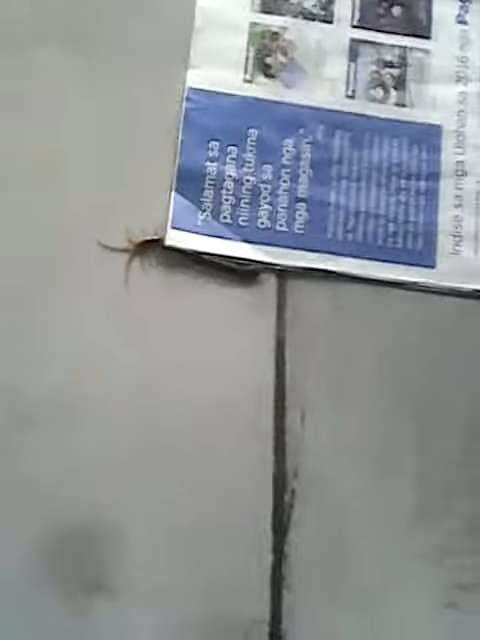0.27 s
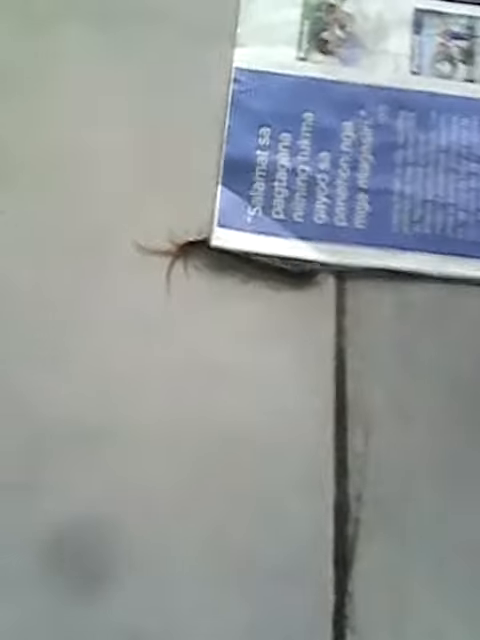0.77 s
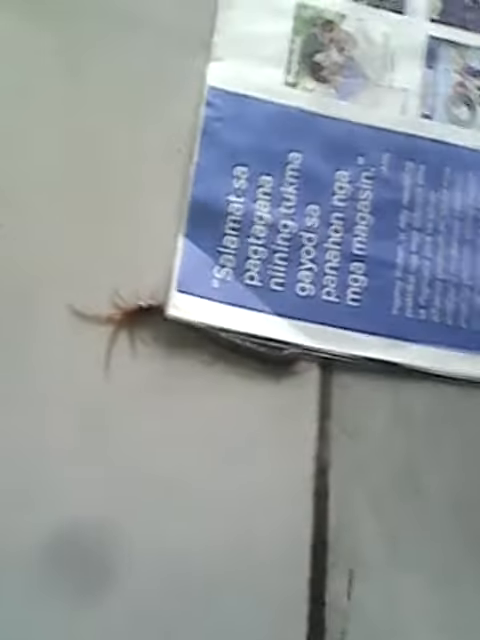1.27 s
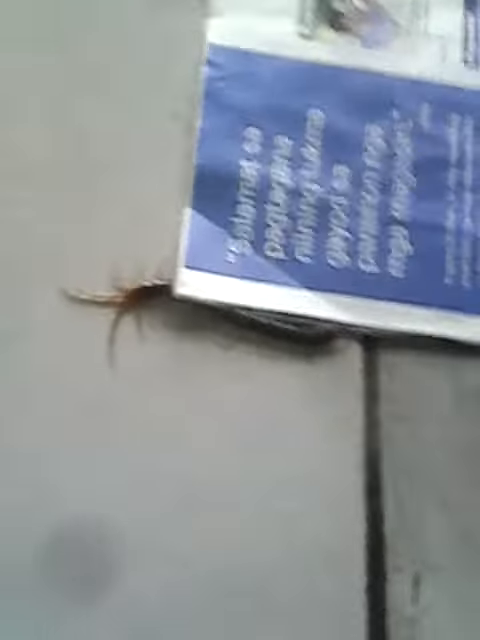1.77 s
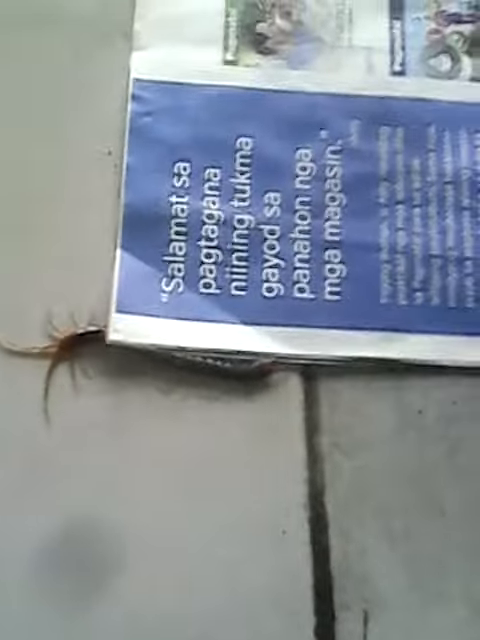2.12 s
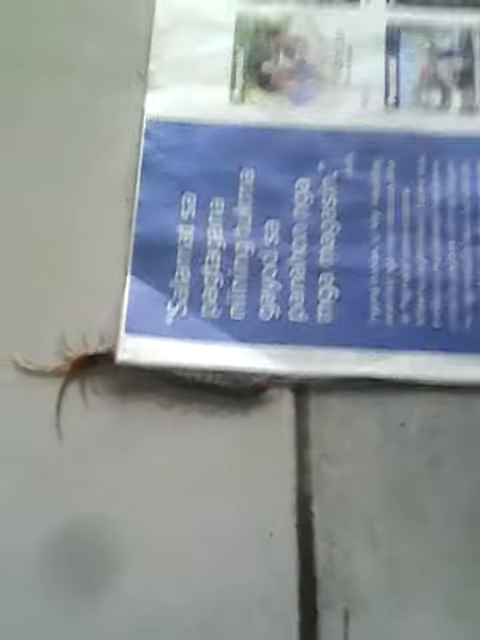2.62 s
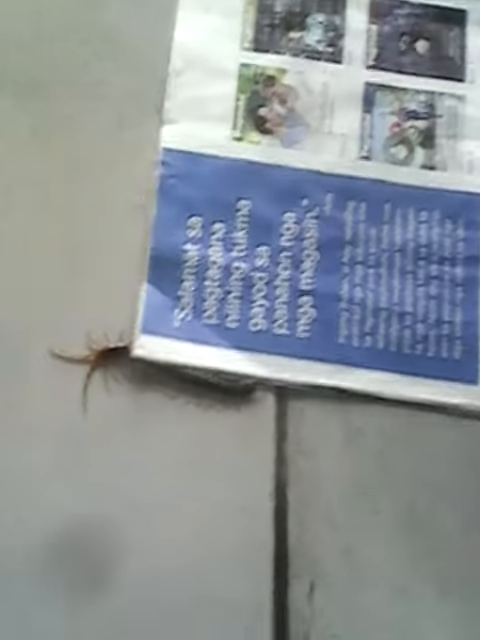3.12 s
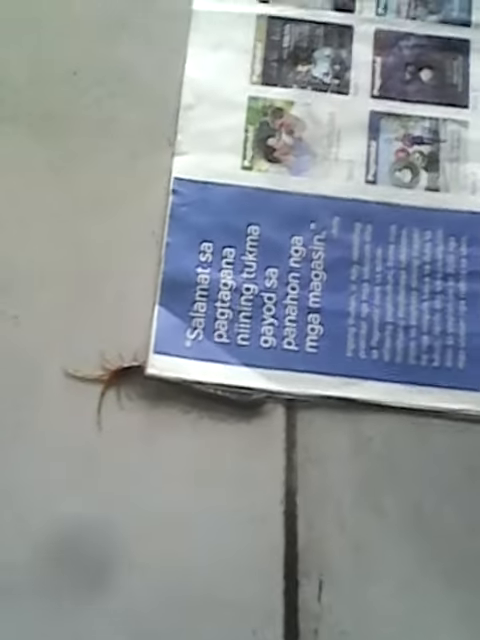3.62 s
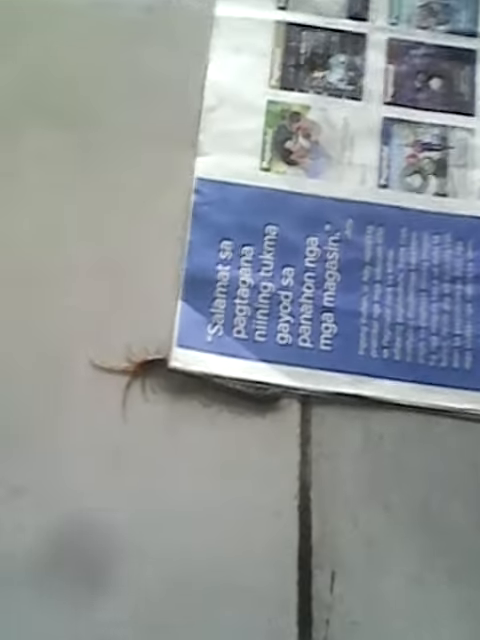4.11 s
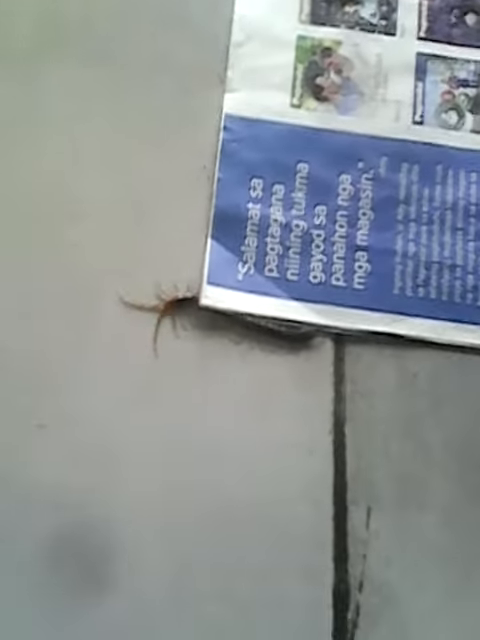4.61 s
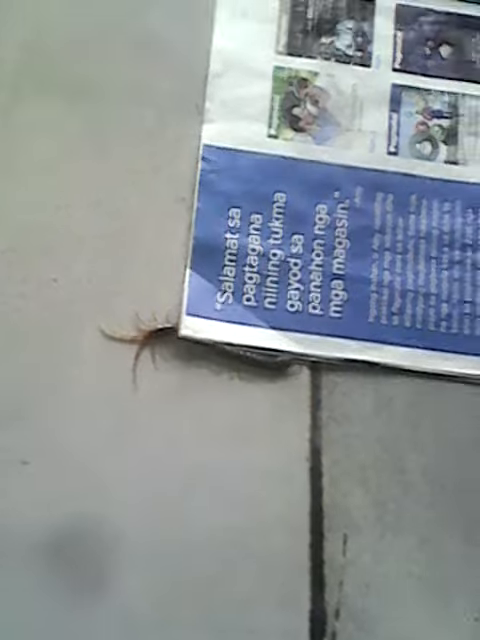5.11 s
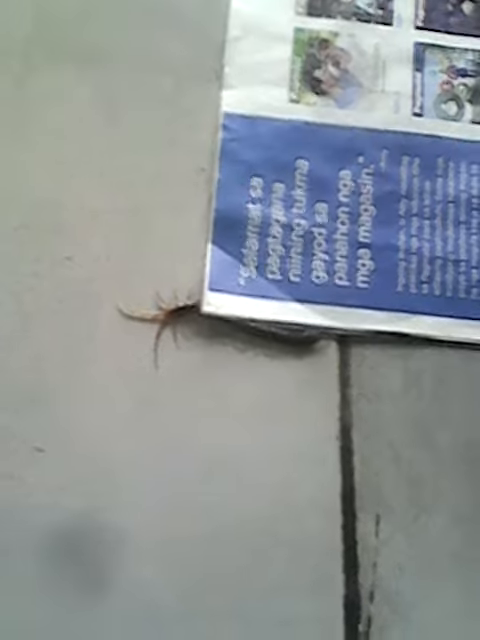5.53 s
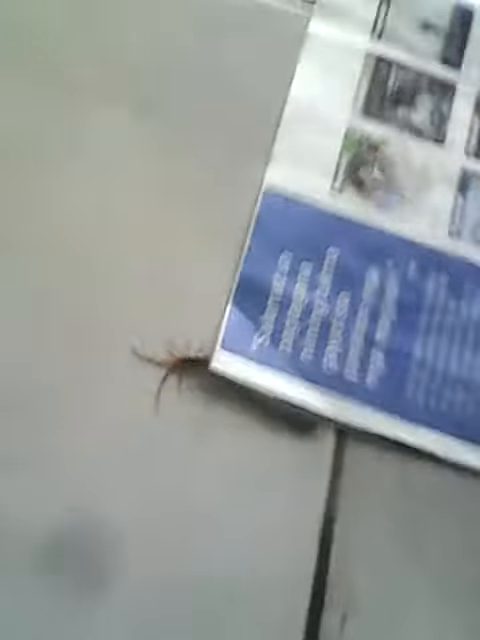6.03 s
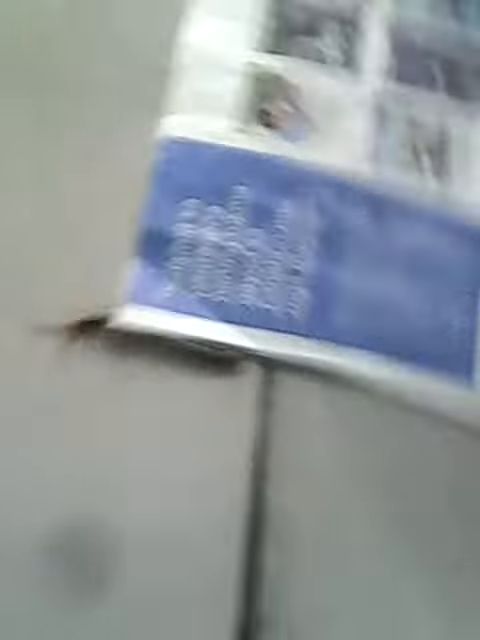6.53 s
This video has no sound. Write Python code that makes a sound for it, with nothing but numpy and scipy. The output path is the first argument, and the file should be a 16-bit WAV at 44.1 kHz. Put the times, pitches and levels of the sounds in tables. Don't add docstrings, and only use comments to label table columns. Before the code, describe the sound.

Over a low, wavering drone and soft hiss, a finger drags stickily across a plastic shell, making clustered creaks. The shell then lets go in sparse, short ticks, some soft, some sharp. After a quieter gap, rough hand rubbing and hard knocks crowd together, the loudest close to the end, with a deep thud just after. The sound is close, muffled on top, with a short dull room tail.

```python
import sys
import numpy as np
from scipy import signal
from scipy.fft import rfft, irfft, next_fast_len
from scipy.io import wavfile
from scipy.ndimage import uniform_filter1d, map_coordinates

SR = 44100
rng = np.random.default_rng(int(sys.argv[2]) if len(sys.argv) > 2 else 0)


def gain_from_db(level_db):
    decades = np.asarray(level_db, float) / 20
    return 10 ** decades


def put_to_file(sound):
    columns = np.atleast_2d(sound).T
    safe = np.clip(columns, -1, 1)
    whole_steps = np.round(safe * 32767)
    wavfile.write(sys.argv[1], SR, whole_steps.astype(np.int16))


N = 299233

# pitch in Hz, width in Hz, steadiness from 0 to 1.
DRONE_TONES = [(183.2, 18, 0.8), (411.5, 24, 0), (578.5, 10, 0.8), (1839, 72, 0.1)]
DRONE_IDLE_DB = [-71.5, -71, -70, -92.5]
# centre in seconds, length in seconds, level in
# dB.
DRONE_SWELLS = [
    [(.48, 0.21, -64), (1.45, 0.47, -68), (4.8, 0.24, -72), (6.55, 0.1, -53)],
    [(1.23, 0.082, -74), (2.3, 0.55, -68), (4.8, 1, -80.5), (5.88, 0.04, -62), (6.62, 0.071, -60)],
    [(2.1, 1, -67), (6.1, 0.24, -62), (6.65, 0.059, -57.5)],
    [(1.6, 0.16, -71), (2.3, 0.78, -82)],
]
# pitch in Hz, width in Hz, level over the air in dB, steadiness 0 to 1.
STEADY_TONES = [(77, 12, -14, 0.6), (123.9, 20, -7, 0.37), (352.6, 18, -21, .3), (647, 34, -16.5, .3),
                (6140, 1700, -29.5, .1)]
# frequency in Hz, level in dB per Hz.
AIR_COLOUR = [(20, -11), (45, -21.5), (100, -18.5), (171, 0), (324, -5.5), (500, -9.5), (700, -6.5),
              (1020, -11.5), (1240, -16.5), (1780, -20), (2280, -25), (5720, -33.5), (7990, -45),
              (15600, -46.5)]
# centre in seconds, length in seconds, level in dB.
DRAUGHTS = [
    (1.7, 0.11, -72),
    (4.05, 0.05, -84),
    (6.1, 0.13, -68),
    (6.72, .1, -66.5),
]

# start in seconds, pressure at the start in dB,
# pressure at the end in dB, brightness in dB, dryness of the skin in dB.
FINGER_STROKES = [(.555, -74, -64.5, -6, 7), (.627, -73, -56.5, -3, 14.5), (.647, -52.5, -52, -0.8, 6.5),
                  (.678, -58.5, -62, -14.5, 16), (.735, -64, -54, 0.5, 5), (.808, -47, -71.5, -1.9, 5.5),
                  (.886, -45, -43.5, -2, 0), (.944, -51, -43, -3.5, 1), (1.005, -46, -72, -19.5, 5),
                  (1.085, -74, -52.5, -1.5, 3), (1.126, -42, -40, -2, -1), (1.192, -58.5, -61.5, -9, 1),
                  (1.278, -50.5, -74.5, -7, 3), (1.707, -48, -50.5, -17.5, -8), (1.78, -45.5, -52, -20, -9),
                  (1.822, -60, -67, -21, -6), (3.03, -64, -62, -15.5, 11), (3.075, -63, -44, -5.5, 3.5),
                  (3.1, -52, -53, -6, 0), (3.15, -50.5, -77, -12.5, -10)]
# start in seconds, pressure
# in dB, brightness in dB.
SKIN_SETTLES = [(1.901, -53, -10), (1.947, -49.5, -14), (2.608, -49.5, -20), (2.644, -54.5, -18),
                (2.924, -58.5, -4), (2.955, -63, -12), (3.405, -50.5, -31), (3.426, -61, -13),
                (3.58, -50.5, -21), (4.235, -50, -23), (4.91, -61, -25), (4.96, -61, -5)]
# start in seconds, pressure at the start in dB, pressure at the end in dB,
# brightness in dB, dryness of the skin in dB.
HAND_STROKES = [(5.666, -53, -41, -6.5, 3), (5.696, -45, -46, -4, 0), (5.752, -34, -53, -3, 3.5),
                (5.786, -56, -44.5, -1.5, 5.5), (5.822, -39, -39.5, -5.5, 6), (5.862, -51.5, -63, 5, 3.5),
                (5.926, -64.5, -61, 14.5, -11), (5.956, -61, -72, 12, -16), (6.012, -50, -63.5, 11.5, -0.5),
                (6.052, -49.5, -44, 2.5, 2), (6.127, -47, -57.5, 7, -0.5), (6.182, -38, -51.5, 0.1, -2),
                (6.227, -48.5, -55, 0.5, -8), (6.316, -60, -69, -3, -21), (6.366, -65, -66, -6, -13),
                (6.41, -43.5, -52.5, 1.5, 0), (6.44, -41, -39.5, -5.5, 6), (6.499, -54, -51.5, -5, 3),
                (6.538, -52, -59, 10, 2), (6.565, -49, -50, 4, 2), (6.6, -43, -64, 2.5, 0),
                (6.622, -63, -74, -2, -16), (6.7, -73.5, -72.5, -4, -26)]
SKIN_LIFTS = [.58, .675, 1.001, 1.187, 1.4, 1.775, 1.862, 3.065, 3.2, 5.86, 6.174, 6.493, 6.785]
# level in dB, dB per dB of brightness, dB per dB of dryness.
STROKE_MIX = [
    [(-3, 0.52, -0.089), (-2, 0.63, 0.18), (-3.5, 1.73, 1.04), (-10, 2.06, 1.8)],
    [(-1.5, 0.58, -0.3), (0.2, 1.24, 0.13), (-9, 1, 1), (-15.5, 1.83, 1.7)],
]
# resonance in Hz, width in Hz, level in dB.
RING_MODES = [(921, 277, 14.5), (726, 160, -33)]
# resonance in Hz, width in Hz, level in dB.
BODY_MODES = [
    [(1764, 620, -1), (1540, 230, -20)],
    [(1605, 610, 3), (2180, 970, -5)],
]
# resonance in Hz, width in Hz, level in dB.
HISS_MODES = [
    [(2810, 480, 5.5), (3490, 810, 2.5)],
    [(2880, 1400, 7), (4020, 1400, -2.5)],
]
# resonance in Hz, width in Hz, level in dB.
RASP_MODES = [
    [(4110, 1100, 3.7), (5100, 860, 4)],
    [(4460, 1370, 5)],
]
# resonance in Hz, width in Hz, level in dB.
FIZZ_MODES = [
    [(6000, 750, 0.1), (6800, 1400, -3.3)],
    [(6000, 1340, 2)],
]

# time in seconds, peak in dB, ring in Hz, snap in dB.
CREAKS = [(0.648, -26.5, 885, -15), (0.656, -32, 780, -1.5), (0.662, -23.5, 874, -12),
          (0.666, -26.5, 940, -10), (0.67, -29.5, 860, -3), (0.89, -25, 903, -5), (0.898, -31, 820, 1),
          (0.901, -27, 1060, -19), (0.914, -33.5, 980, 3), (0.928, -21, 940, -8), (0.934, -32, 902, -11),
          (1.128, -18.5, 920, -30), (1.136, -23.5, 950, -11), (1.155, -25.5, 1000, -16),
          (1.707, -35.5, 870, -32), (1.84, -34, 975, -19)]
# time in seconds, peak in dB, ring in Hz, snap in dB.
TICKS = [(1.268, -44.5, 860, -9), (1.417, -44.5, 900, -3), (1.889, -39, 900, -20),
         (1.894, -23, 1010, -10.5), (1.942, -28.5, 950, -10), (2.587, -45, 1040, -16),
         (2.603, -29, 986, -16.5), (2.641, -31.5, 947, -12.5), (2.812, -57, 1030, 0),
         (2.923, -42.5, 860, 3), (2.952, -46.5, 900, -5), (3.42, -28.5, 946, -12.5), (3.572, -27, 969, -15),
         (4.187, -50, 885, -8), (4.229, -29, 943, -15), (4.906, -45, 970, -13), (4.958, -37.5, 940, -22),
         (5.211, -53, 802, -6)]
# resonance in Hz, width in Hz, level in dB.
SNAP_MODES = [(1775, 430, 6.5), (2810, 650, -1.5), (4200, 1300, -17), (5700, 1500, -21)]
# centre in seconds, length in seconds, level in dB.
SQUEAKS = [(.66, 0.009, -76.5), (.9, 0.011, -84), (1.15, .02, -86), (5.762, 0.0092, -70),
           (5.838, 0.015, -68.5), (6.018, 0.0065, -88), (6.12, 0.015, -91), (6.475, 0.013, -86),
           (5.7503, 0.00025, -50), (6.0113, .0002, -81), (6.57, .025, -100)]
# resonance in Hz, width in Hz, level in dB.
SQUEAK_MODES = [(8600, 2500, 12.5), (12500, 5000, -9)]
# centre in seconds, length in seconds, rumble in dB.
GRIPS = [(.92, 0.039, -52), (1.15, 0.037, -53.5), (1.93, 0.041, -53), (5.77, 0.014, -54.5),
         (5.83, 0.059, -53), (6.29, 0.039, -51.5), (6.413, 0.0036, -31), (6.443, 0.0088, -35),
         (6.47, 0.017, -45.5), (6.56, 0.0095, -51), (6.63, 0.0054, -48), (6.73, 0.081, -79)]
# resonance in Hz, width in Hz, level in dB.
RUMBLE_MODES = [(414, 150, 1), (171, 65, -3), (90, 72, -16)]

# time in seconds, peak in dB, thud in Hz, clack in dB, stiffness of the spot (1 is average).
KNOCKS = [
    (5.7496, -11.5, 604, 5.5, 0.89),
    (5.9261, -45, 600, 5, 0.99),
    (6.0109, -37.5, 600, 19, 1.26),
    (6.1814, -31.5, 770, 3.5, 0.81),
    (6.4105, -24, 437, 7.5, 0.64),
    (6.5359, -1.5, 480, 0.8, 1.036),
    (6.5962, -10.5, 294, -11, 0.97),
]
# resonance in Hz, width in Hz, level in dB.
CLACK_MODES = [(1554, 1510, 14), (2650, 830, 8), (3300, 220, -9), (4300, 1100, -6.5), (6160, 2200, 8),
               (8800, 9300, -36)]
# time in seconds, ring in Hz, level in dB, direction (-1 or 1).
RAPS = [
    (6.4112, 910, -14.5, -1),
    (6.4558, 743, -17.5, 1),
]
# time in seconds, ring in Hz, level in dB.
RATTLES = [
    (5.7499, 2970, -13),
    (6.539, 2470, -24),
]


def unit(x):
    return x / np.sqrt(np.mean(x ** 2) + 1e-20)


def filtered(x, response):
    m = next_fast_len(len(x) + 8192)
    return irfft(rfft(x, m) * response(np.fft.rfftfreq(m, 1 / SR)), m)[:len(x)]


def modes(table, order=1):
    def response(f):
        total = 0
        for k, (hz, width, db) in enumerate(table):
            damping = 1j * f * width
            total = total + (-1) ** k * gain_from_db(db) * (damping / (hz * hz - f * f + damping)) ** order
        return total
    return response


def wobble(rate):
    knots = rng.standard_normal(int(N * rate / SR) + 4)
    return map_coordinates(knots, [np.arange(N) * rate / SR])


def swells(table):
    t = np.arange(N) / SR
    return sum(gain_from_db(db) * np.exp(-.5 * ((t - s) / length) ** 2) for s, length, db in table)


def tone(hz, width, steady):
    x = unit(filtered(rng.standard_normal(next_fast_len(N)), modes([(hz, width, 0)], order=2)))
    envelope = np.abs(signal.hilbert(x)).clip(.05)
    return unit(x / envelope ** steady)[:N]


def hum():
    drones = 0
    for idle_db, load, line in zip(DRONE_IDLE_DB, DRONE_SWELLS, DRONE_TONES):
        drones = drones + (gain_from_db(idle_db) + swells(load)) * tone(*line)
    steady = sum(gain_from_db(db) * tone(hz, width, even) for hz, width, db, even in STEADY_TONES)
    f, db = np.transpose(AIR_COLOUR)

    def colour(hz):
        return gain_from_db(np.interp(np.log(hz + 1), np.log(f), db)) * (hz < 15650)

    air = unit(filtered(rng.standard_normal(N), colour))
    air_level = gain_from_db(-61.5) + swells(DRAUGHTS)
    return drones + air_level * (gain_from_db(0.77 * wobble(3.66)) * air + steady)


def patchy(depth_db):
    z = signal.stft(rng.standard_normal(N), nperseg=256)[2]
    field = uniform_filter1d(rng.standard_normal(z.shape), size=2, axis=0)
    field = uniform_filter1d(field, size=10, axis=1)
    return signal.istft(z * gain_from_db(depth_db * unit(field)), nperseg=256)[1][:N]


def rub(level, body):
    grains = gain_from_db(wobble(180)) * patchy(depth_db=2.5)
    response = modes(body, order=2)
    return filtered(level * grains, response) / np.std(filtered(grains, response))


def chained(rows):
    ends = np.sort([r[0] for r in rows] + SKIN_LIFTS)
    return [(s, ends[ends > s][0] - s, *rest) for s, *rest in rows]


def slides(rows, mix, crackle_db):
    edge_s = .0025
    levels = np.zeros((len(mix) + 1, N + SR))
    for s, length, start_db, end_db, bright_db, dry_db in rows:
        t = np.arange(-edge_s / 2, length + edge_s / 2, 1 / SR)
        edges = np.clip(np.minimum(t, length - t) / edge_s + .5, 0, 1)
        grip = edges * gain_from_db(start_db + (end_db - start_db) * t / length)
        groups = gain_from_db([0] + [db + k * bright_db + j * dry_db for db, k, j in mix])
        levels[:, round((s + t[0]) * SR):][:, :len(t)] += np.outer(groups, grip)
    return levels[:, :N] * unit(gain_from_db(crackle_db * wobble(350)))


def strokes():
    settle_s, fade_db, dry_db = 0.032, 12, -15
    settles = [(s, settle_s, db, db - fade_db, bright_db, dry_db) for s, db, bright_db in SKIN_SETTLES]
    finger = slides(chained(FINGER_STROKES) + settles, STROKE_MIX[0], crackle_db=2.6)
    hand = slides(chained(HAND_STROKES), STROKE_MIX[1], crackle_db=2)
    out = rub(finger[0] + hand[0], RING_MODES)
    groups = BODY_MODES, HISS_MODES, RASP_MODES, FIZZ_MODES
    for tip, palm, (light, damped) in zip(finger[1:], hand[1:], groups):
        out += rub(tip, light) + rub(palm, damped)
    return out


def swing(hz, rise_s, t60):
    t = np.arange(SR // 20) / SR - .004
    shape = gain_from_db(-60 * t / t60) / (1 + np.exp(-t / rise_s))
    return np.cos(2 * np.pi * hz * t) * shape / shape.max()


def blow(table, contact_s):
    kick = np.zeros(SR // 20)
    kick[:40] = np.exp(-.5 * ((np.arange(40) / SR - .0003) / contact_s) ** 2)
    ring = filtered(kick, modes(table, order=2))
    return ring / np.abs(ring).max()


def add(track, s, sound):
    part = track[round(s * SR):][:len(sound)]
    part += sound[:len(part)]


def shell_slips(table, thud_db):
    out = np.zeros(N)
    for s, db, ring_hz, snap_db in table:
        chance = rng.standard_normal(len(SNAP_MODES))
        upper = [(hz, width, level + 1.3 * u) for (hz, width, level), u in zip(SNAP_MODES, chance)]
        creep = swing(ring_hz, rise_s=0.00056, t60=0.028)
        add(out, s - .0033 - 1 / ring_hz, gain_from_db(db - 25.5) * creep)
        add(out, s - .0033, gain_from_db(db) * swing(ring_hz, rise_s=0.00049, t60=0.014))
        add(out, s, gain_from_db(db + snap_db) * blow(upper, contact_s=.00004))
        add(out, s - .003, -gain_from_db(db + thud_db) * swing(424, rise_s=0.0004, t60=0.02))
    return out


def creaks():
    return shell_slips(CREAKS, thud_db=-20.5)


def tiles(x):
    t = np.arange(SR // 4) / SR
    noise = rng.standard_normal(len(t)) * gain_from_db(-60 * t / 0.24)
    tail = filtered(noise, modes([(900, 4300, 3.0), (3000, 1800, 1.0)]))
    late = np.pad(x, (200, 0))
    return signal.fftconvolve(late, tail / np.linalg.norm(tail))[:N]


def squeaks():
    return rub(swells(SQUEAKS), SQUEAK_MODES)


def grips():
    return rub(swells(GRIPS), RUMBLE_MODES)


def ticks():
    return shell_slips(TICKS, thud_db=-13)


def knocks():
    out = np.zeros(N)
    for s, db, thud_hz, clack_db, stiffness in KNOCKS:
        spot = [(hz * stiffness, width, level) for hz, width, level in CLACK_MODES]
        contact_s = .000038 / stiffness ** 1.8
        add(out, s - .0001, -gain_from_db(db + clack_db) * blow(spot, contact_s))
        back_s = s + .0016
        add(out, back_s - .004, -gain_from_db(db) * swing(thud_hz, rise_s=0.00033, t60=0.0056))
    for s, hz, db, way in RAPS:
        add(out, s - .004, np.sign(way) * gain_from_db(db) * swing(hz, rise_s=0.00022, t60=0.016))
    for s, hz, db in RATTLES:
        add(out, s - .004, gain_from_db(db) * swing(hz, rise_s=0.00012, t60=0.0058))
    return out


def microphone(hz):
    ratio = hz / 7090
    top = 1 / (1 + 1j * ratio / 0.73 - ratio ** 2) ** 3
    return top * (1j * hz / (120 + 1j * hz)) ** 3


def scene():
    hits = creaks() + ticks() + knocks()
    handling = filtered(strokes() + hits + gain_from_db(-26.5) * tiles(hits), microphone)
    return (hum() + handling + squeaks() + grips())[None]


def top_cut(x):
    return signal.sosfilt(signal.butter(12, 16620, fs=SR, output="sos"), x)


def record(dry):
    clipped = dry / (1 + np.abs(dry) ** 9) ** (1 / 9)
    return top_cut(clipped)


dry = scene()
out = record(dry)
put_to_file(out)
```